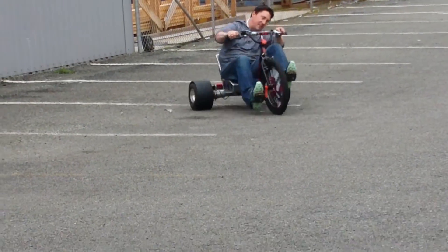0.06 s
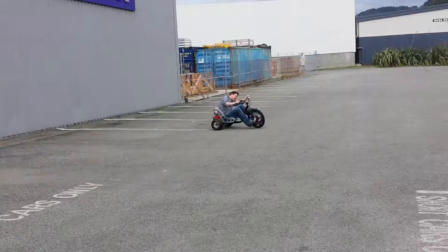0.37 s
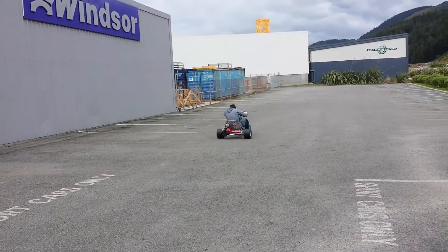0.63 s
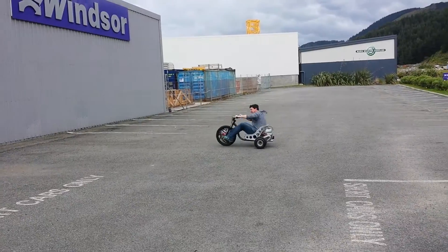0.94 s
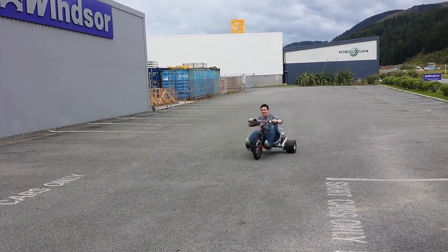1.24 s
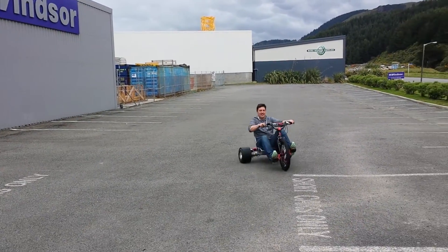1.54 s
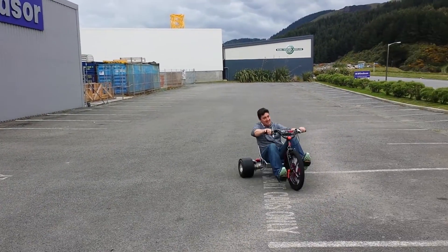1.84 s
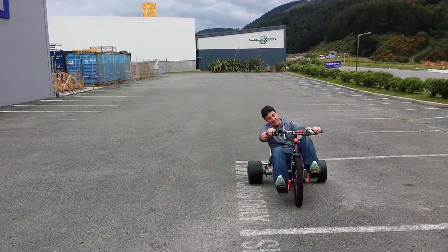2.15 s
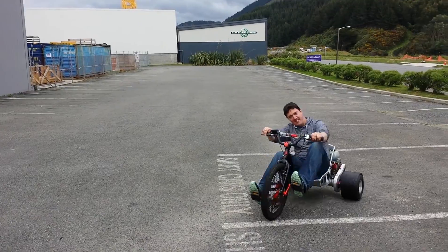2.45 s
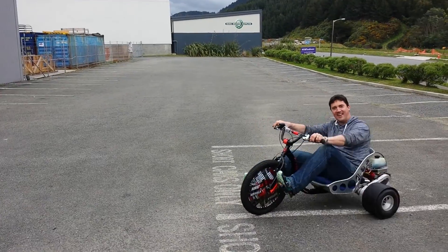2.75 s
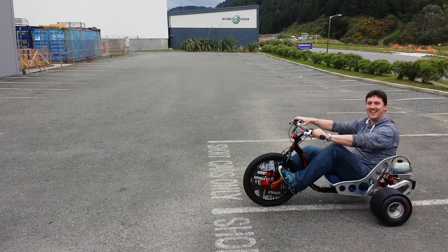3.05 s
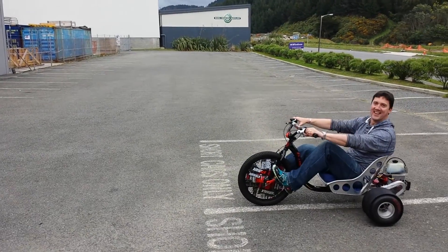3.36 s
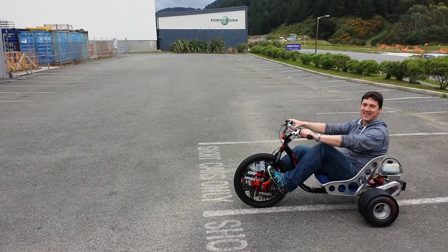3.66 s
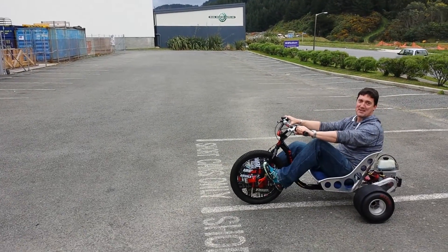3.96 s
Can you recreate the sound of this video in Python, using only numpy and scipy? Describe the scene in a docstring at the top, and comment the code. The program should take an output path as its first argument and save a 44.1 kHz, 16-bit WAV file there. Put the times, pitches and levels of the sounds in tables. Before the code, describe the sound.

A small petrol trike engine roars as its tyres slide, then drops to an idle.

```python
"""An open asphalt car park, where a drift trike with a single-cylinder petrol engine spins round.
The exhaust roars and echoes off warehouse walls while the hard rear tyres slide and squeal.
The engine drops to a lumpy idle as the trike scrubs to a halt close by, then gives one quick rev.
The valve gear clatters between firings and a low wind picks up.
Sharp cracks come from grit under the wheels, and once from the exhaust as the throttle opens."""
import sys
import numpy as np
from scipy import signal
from scipy.fft import rfft, irfft
from scipy.io import wavfile

SR = 44100
rng = np.random.default_rng(int(sys.argv[2]) if len(sys.argv) > 2 else 0)


def log_audio(samples):
    """Write samples as a 16-bit WAV file to the path given in sys.argv[1]."""
    # one column per channel
    frames = np.atleast_2d(samples).T
    # limit to full scale, then quantise
    limited = np.clip(frames, -1, 1)
    pcm = np.round(limited * 32767).astype(np.int16)
    wavfile.write(sys.argv[1], SR, pcm)


N = 176400
T = np.arange(N) / SR
FREQS = np.fft.rfftfreq(N, 1 / SR)


def amp(db):
    """Turn decibels into a number to multiply by."""
    return 10 ** (np.asarray(db) / 20)


def unit(x):
    """Scale a signal to an average (RMS) strength of one."""
    return x / np.sqrt(np.mean(x ** 2) + 1e-20)


def curve(rows, column=1):
    """One column of a table, joined by straight lines in time."""
    rows = np.array(rows)
    return np.interp(T, rows[:, 0], rows[:, column])


def add(mix, start_s, sound):
    """Drop a sound into the mix at a given time."""
    part = mix[round(start_s * SR):][:len(sound)]
    part += sound[:len(part)]


def colour(x, rows, column=1):
    """Make some frequencies louder and others softer, as a table says."""
    rows, size = np.array(rows), 4096
    hz = abs(np.fft.fftfreq(size, 1 / SR))
    log_gain = np.log(amp(np.interp(np.log(hz + 1), np.log(rows[:, 0]), rows[:, column])))
    response = np.exp(np.conj(signal.hilbert(log_gain)))  # rings after a sound, never before
    ring = np.fft.ifft(response).real[:size // 2]
    return signal.oaconvolve(x, ring)[:N]


def colour_pair(x, rows):
    """Give each ear its own tone colour."""
    return np.array([colour(x[0], rows, column=1), colour(x[1], rows, column=2)])


def noise_pair(alike):
    """Hiss for two ears: unrelated at 0, the same at 1."""
    shared, own = rng.standard_normal((2, N))
    return np.array([shared, alike * shared + np.sqrt(1 - alike ** 2) * own])


def wander(rate_hz):
    """A smooth random wobble, mostly slower than rate_hz."""
    return unit(irfft(rfft(rng.standard_normal(N)) / (1 + (FREQS / rate_hz) ** 4), N))


def per_cycle(cycles, scatter_db):
    """A random strength, held through each engine cycle."""
    return amp(scatter_db * rng.standard_normal(N))[np.floor(cycles).astype(int)]


def firings(cycles, scatter_db):
    """One click at the start of each cycle."""
    return np.diff(np.floor(cycles), prepend=np.floor(cycles[0])) * per_cycle(cycles, scatter_db)


# how fast the engine runs (time [s], firing rate [Hz])
ENGINE_SPEED = [(0.0, 116.64), (0.046, 94.54), (0.166, 111.36), (0.294, 118.85), (0.42, 127.49),
                (0.536, 127.92), (0.6, 113.4), (0.68, 95.46), (0.75, 93.88), (0.95, 92.56), (1.32, 90.86),
                (1.5, 96.04), (1.64, 92.74), (1.72, 73.19), (1.85, 59.4), (2.0, 42.8), (2.13, 37.34),
                (2.22, 44.85), (2.35, 35.77), (2.52, 32.16), (2.68, 43.21), (2.86, 42.38), (2.95, 48.1),
                (3.15, 51.4), (3.2, 66.05), (3.25, 91.97), (3.39, 88.06), (3.48, 72.35), (3.7, 45.86),
                (3.8, 44.76), (3.88, 34.65), (3.94, 45.27), (4.0, 44.53)]
def engine_cycles(lead_s=0):
    """Count engine cycles, running lead_s ahead: the fuel fires at each whole number."""
    speed = curve(ENGINE_SPEED)
    return np.cumsum(speed) / SR + lead_s * speed


def open_throttle(levels, tone):
    """The exhaust under power: a smooth boom on two low notes, and a rough bark at each firing."""
    fade_s, puff_cycles, split_hz = .025, .12, 602
    inside_s = np.minimum(T - levels[0][0], levels[-1][0] - T)
    gate = np.clip(1 + inside_s / fade_s, 0, 1) ** 2
    cycles, port = engine_cycles(), engine_cycles(lead_s=.00061)
    boom = -np.sqrt(2) * sum(amp(curve(levels, k)) * np.sin(2 * np.pi * k * cycles) for k in (1, 2))
    puffs = np.exp(-(port % 1) / puff_cycles) * rng.standard_normal(N)
    bark = colour(.17 * unit(puffs) + unit(firings(port, scatter_db=.9)), tone)
    low = irfft(rfft(bark) / (1 + (FREQS / split_hz) ** 10), N)
    bark = amp(curve(levels, 3)) * unit(low) + amp(curve(levels, 4)) * unit(bark - low)
    return gate * (amp(-.5) * boom + amp(-1.5) * bark)


# loudness of the roar (time [s], lowest note [dB], octave above [dB], low bark [dB], high bark [dB])
ROAR_LEVELS = [(0.0, -39, -32, -42, -38), (0.11, -22, -22, -22.5, -30), (0.142, -21, -20.5, -53, -25.5),
               (0.166, -24, -20, -27, -25.5), (0.276, -20, -29, -27.5, -24.5),
               (0.342, -25, -19.5, -24, -23), (0.388, -21, -17, -27, -21), (0.43, -16.5, -33, -28, -17),
               (0.536, -17, -15.5, -34, -22.5), (0.638, -31, -25, -28.5, -33),
               (0.724, -19.5, -15.5, -24, -20.5), (1.104, -26.5, -18.5, -23.5, -22),
               (1.216, -24.5, -20, -30, -23.5), (1.256, -26, -20.5, -52, -16.5),
               (1.316, -25, -21.5, -45, -28), (1.364, -23, -23, -23.5, -21.5),
               (1.45, -21.5, -18.5, -30, -22.5), (1.544, -17.5, -15, -22, -25),
               (1.612, -19, -15.5, -26.5, -21.5), (1.66, -15.5, -17.5, -28, -29)]
# tone of the bark far off (frequency [Hz], level [dB])
FAR_BARK_TONE = [(170,-36),(280,1),(370,2),(470,-3.5),(560,6.5),(670,3.5),(790,2.5),(930,10.5),(1060,3.5),(1250,-2.5),(1600,-8.5),(3000,-30),(9000,-54)]
def roar():
    """The exhaust far off, its tone shifting as the pipe swings round."""
    return open_throttle(ROAR_LEVELS, FAR_BARK_TONE)


# how late the echo off the long warehouse wall arrives (time [s], delay [s])
WALL_DELAY = [(0,0.018),(.3,0.022),(.6,0.028),(.9,0.033),(1.3,.034),(1.7,0.038)]
def wall_echo(exhaust):
    """One echo that comes later as the trike moves, so the bark swells and turns hollow."""
    bark = signal.sosfilt(signal.butter(2, 350, "high", fs=SR, output="sos"), exhaust)
    return amp(-6) * np.interp(T - curve(WALL_DELAY), T, bark, left=0)


def yard_echoes(exhaust):
    """Many thin, dull echoes bounce off the warehouse walls."""
    echoes_per_s, first_s, fade_60_db_s = 1500, .03, .93
    t = T[:SR // 2]
    echoes = rng.standard_normal((2, len(t))) * (rng.random((2, len(t))) < echoes_per_s / SR)
    echoes *= (t > first_s) * np.exp(-np.log(1000) * t / fade_60_db_s)
    echoes /= np.linalg.norm(echoes, axis=1, keepdims=True)
    dull = colour(exhaust, [(120, -19.5), (400, 16), (3000, 16), (10000, -39)])
    return amp(-20.5) * signal.fftconvolve(dull[None], echoes, axes=1)[:, :N]


# loudness of the valve clatter (time [s], level [dB])
CLATTER_LEVELS = [(0,-35.5),(.4,-25.5),(1.4,-25),(1.8,-31.5),(2.5,-34),(2.68,-25),(3.15,-23),(3.25,-14.5),(3.38,-19.5),(3.47,-20),(3.7,-24.5),(4,-25)]
# tone of its rattle (frequency [Hz], left [dB], right [dB])
RATTLE_TONE = [(690, 5, -23), (950, -14, -11), (1410, 0, -4.5), (2250, -42, -9), (2580, -7.5, -23),
               (2870, -78, 0), (3330, -41, -3.5), (4400, -45, 0), (5730, -16, -5.5), (5800, -9, -20),
               (6940, -12, -12), (7870, -12, -20.5), (8150, -0.5, -1), (10100, -14, -43.5),
               (10900, -10.5, -21), (13000, -49, -24)]
# notes the engine metal rings at (frequency [Hz], left [dB], right [dB])
METAL_NOTES = [(3200,-33,1),(3290,-5,2),(3610,-7,-23),(4220,-39,3),(4610,-1.5,4.5),(4810,-31,3.5),(7160,-2.5,-34),(7910,-14,-4),(8780,-3.5,-41),(8630,3.5,-40),(9750,-16,-4.5)]
def valve_gear():
    """Between firings a burst of small knocks rattles the engine and sets its metal ringing."""
    lag_cycles, rise_cycles, fade_cycles = .392, .07, .33
    knocks_per_s, ring_s = 3500, .0048
    cam = engine_cycles() - lag_cycles
    burst = np.minimum(cam % 1 / rise_cycles, 1) * np.exp(-(cam % 1) / fade_cycles)
    burst *= per_cycle(cam, scatter_db=1.1)
    rattle = unit(colour_pair(noise_pair(alike=.83) * (.28 + burst), RATTLE_TONE))
    knocks = burst ** 2 * (rng.random(N) < knocks_per_s / SR)
    t, metal = T[:SR // 20], np.zeros((2, N))
    for hz, left_db, right_db in METAL_NOTES:
        detune = 1 + .019 * rng.standard_normal((2, 1))
        ring = np.sin(2 * np.pi * hz * detune * t) * np.exp(-t / ring_s)
        metal += amp([[left_db], [right_db]]) * signal.oaconvolve(knocks[None], ring, axes=1)[:, :N]
    metal = signal.sosfilt(signal.butter(5, [2880, SR / 4], "band", fs=SR, output="sos"), metal)
    return amp(curve(CLATTER_LEVELS)) * unit(rattle + amp(-4) * unit(metal))


def grind(levels, tone, grain_db, judder_db, judder_hz, alike):
    """Hard plastic on asphalt: a grainy hiss whose lows and highs judder with the rough ground."""
    grains = colour_pair(noise_pair(alike) * amp(grain_db * wander(rate_hz=1200)), tone)
    low = signal.sosfiltfilt(signal.butter(2, 6900, fs=SR, output="sos"), grains)
    ground = wander(judder_hz)
    left, right = sum(band * amp(judder_db * np.tanh(ground + wander(judder_hz)))
                      for band in (low, grains - low))
    return np.array([unit(left) * amp(curve(levels, 1)), unit(right) * amp(curve(levels, 2))])


# loudness of the sliding tyres (time [s], left [dB], right [dB])
SLIDE_LEVELS = [(0,-33.5,-27.5),(.28,-27.5,-21),(.45,-18.5,-11.5),(.68,-18,-8.5),(.71,-13,-7),(.9,-12,-3.5),(1.05,-15.5,-8.5),(1.25,-19,-10),(1.45,-23,-17),(1.62,-28,-22),(1.76,-33.5,-27.5),(2,-37,-33),(2.3,-70,-70)]
# tone of their grinding (frequency [Hz], left [dB], right [dB])
SLIDE_TONE = [(484, -16, -40.5), (705, -23.5, -11), (1110, -8.5, -10), (1900, -9.5, -9.5), (2640, -11, -12),
              (3780, -11.5, -6.5), (3930, -19, -7), (4870, -19.5, -4), (6050, -18, -16.5),
              (7420, -21.5, -28), (7900, -18, -25.5), (10630, -26.5, -38.5), (13700, -42, -36),
              (15600, -73, -98)]
# notes they squeal at (frequency [Hz], level [dB])
SQUEAL_NOTES = [(1020,-14.5),(1230,3),(1760,-6.5),(3600,1.5),(4760,3.5)]
def tyre_slide():
    """The rear tyres grind sideways; sticking and slipping adds fuzzy, wavering squeals."""
    squeal = np.zeros((2, N))
    for hz, db in SQUEAL_NOTES:
        cycles = np.cumsum(hz * (1 + .03 * wander(rate_hz=7))) / SR
        fuzz = wander(rate_hz=26.6)
        squeal += amp(db) * fuzz * np.sin(2 * np.pi * (cycles + .13 * rng.random((2, 1))))
    squeal = amp(-10) * amp([curve(SLIDE_LEVELS, 1), curve(SLIDE_LEVELS, 2)]) * unit(squeal)
    return squeal + grind(SLIDE_LEVELS, SLIDE_TONE, grain_db=-.5, judder_db=2.1, judder_hz=90, alike=.53)


# tone of the background (frequency [Hz], left [dB], right [dB])
AIR_TONE = [(20,-35,-32),(60,-5.5,-7),(162,-2.5,-3),(540,-17,-12.5),(1590,-24.5,-33),(5360,-24.5,-15),(15300,-45,-63)]
def open_air():
    """The steady, soft rush of the outdoors."""
    return amp(-30.5) * unit(colour_pair(noise_pair(alike=1), AIR_TONE))


# each sharp crack (time [s], level [dB], fade time [s])
CRACKS = [(0.062,-11,0.0012),(.4,-1.5,0.0011),(0.694,-17,.003),(2.227,-13,0.0034),(2.391,-0.5,0.0019),(2.524,-19,0.0016),(2.7681,-11,0.011),(2.8155,-16,0.0026),(3.018,-22,0.0029),(3.907,-32,0.0032),(3.9525,-26,0.0069)]
# tone of a crack (frequency [Hz], left [dB], right [dB])
CRACK_TONE = [(400,-15,5),(890,-9.5,1),(1350,14,1.5),(2220,-6,9.5),(2740,2,-8.5),(3280,-7,9),(5000,-22,4),(6640,-10,-6.5),(9200,-8,-16),(15000,-34,-42)]
def sharp_cracks():
    """Short bursts of noise: grit under the wheels, and the exhaust's snap as the throttle opens."""
    force, t = np.zeros(N), T[:SR // 10]
    for start_s, db, fade_s in CRACKS:
        add(force, start_s, amp(db) * np.exp(-t / fade_s))
    return amp(3.5) * colour_pair(force * noise_pair(alike=.9), CRACK_TONE)


# harder firings at idle and as the throttle opens or shuts (rough time [s], level [dB])
HARD_FIRINGS = [(.695,-2.5),(2.879,-12),(2.943,-10),(3.025,-6.5),(3.106,-4),(3.183,-9),(3.417,-3),(3.44,-1.5),(3.769,-5.5),(3.917,-29),(3.961,-5.5)]
def pops():
    """Each pop is one quick push and pull of air, placed on the nearest firing."""
    width_s, out = .00077, np.zeros(N)
    fired_s = T[np.flatnonzero(np.diff(np.floor(engine_cycles())))]
    for near_s, db in HARD_FIRINGS:
        offset = (T - fired_s[np.argmin(abs(fired_s - near_s))]) / width_s
        out -= amp(db) * 2 * offset / (1 + offset ** 2) ** 2
    return out


# loudness of the exhaust with the throttle shut (time [s], level [dB])
IDLE_LEVELS = [(0,-57),(1.62,-75),(1.67,-23),(1.85,-22),(2,-22.5),(2.45,-21.5),(2.8,-21.5),(3.17,-18),(3.24,-40),(3.39,-35),(3.45,-15),(3.55,-17.5),(4,-19.5)]
# tone of one thud (frequency [Hz], level [dB])
THUD_TONE = [(20,-91),(45,-8),(85,-5.5),(135,11.5),(190,4.5),(230,2.5),(300,0),(370,-2),(450,-33),(580,-8),(800,-35),(1300,-62),(4000,-112)]
def idle():
    """Soft, uneven thuds, each ringing the silencer at a slightly different pitch."""
    pipe_hz, ring_s = 261, .005
    clicks = firings(engine_cycles(lead_s=.001975), scatter_db=1.1) / np.sqrt(curve(ENGINE_SPEED))
    t, pipe = T[:SR // 20], np.zeros(N)
    for at in np.flatnonzero(clicks):
        hz = pipe_hz * np.exp(.15 * rng.standard_normal())
        add(pipe, at / SR, clicks[at] * np.sin(2 * np.pi * hz * t) * np.exp(-t / ring_s))
    thuds = unit(colour(clicks, THUD_TONE))
    return amp(curve(IDLE_LEVELS)) * unit(thuds + amp(1.5) * unit(pipe))


# loudness of the stopping tyres (time [s], left [dB], right [dB])
SCRUB_LEVELS = [(1.75,-65,-57),(1.92,-33.5,-29),(2,-19.5,-17.5),(2.22,-25,-18.5),(2.44,-28.5,-22.5),(2.58,-22,-18),(2.72,-33,-27),(2.85,-31,-30.5),(3.1,-39,-30.5),(3.3,-57,-65)]
# their tone (frequency [Hz], left [dB], right [dB])
SCRUB_TONE = [(530, -0.5, -4), (890, -5.5, -10.5), (1260, 4.5, 1.5), (1550, 4, -2), (2100, -6.5, -1.5),
              (2660, -3.5, -9.5), (2970, -5.5, -2.5), (5070, -20, -3.5), (6300, -14, -29), (8500, -43, -29),
              (11000, -44, -33), (14700, -94, -46)]
def tyre_scrub():
    """The tyres scrape to a halt with a coarser grain and a slower, deeper judder."""
    return grind(SCRUB_LEVELS, SCRUB_TONE, grain_db=2.5, judder_db=4, judder_hz=44.6, alike=.69)


# loudness of the wind (time [s], level [dB])
WIND_LEVELS = [(0,-51),(1.3,-50),(1.7,-45),(2.3,-33),(2.6,-23.5),(3.3,-25),(4,-23.5)]
# its tone (frequency [Hz], level [dB])
WIND_TONE = [(10,-1),(22,-11),(45,-5),(80,-5),(200,-18),(1000,-72)]
def wind():
    """Wind blowing on the microphone makes a low rumble."""
    rumble = np.array([colour(ear, WIND_TONE) for ear in noise_pair(alike=.17)])
    return amp(curve(WIND_LEVELS)) * unit(rumble)


# loudness of the rev (time [s], lowest note [dB], octave above [dB], low bark [dB], high bark [dB])
REV_LEVELS = [(3.19, -27, -22.5, -19, -24), (3.244, -21, -15, -19.5, -24), (3.38, -21.5, -16, -18.5, -20.5),
              (3.41, -33, -29, -20, -22.5)]
# tone of the bark close by (frequency [Hz], level [dB])
NEAR_BARK_TONE = [(120,-19),(270,-3),(360,7),(480,-3.5),(620,2),(760,-13.5),(1050,-9),(1400,-28),(2200,-22),(4000,-21),(9000,-66)]
def quick_rev():
    """The throttle opens for a moment and the exhaust barks close by."""
    return open_throttle(REV_LEVELS, NEAR_BARK_TONE)


def scene():
    """Mix everything for two ears, with the nearby exhaust a little to the right."""
    far = roar()
    near = pops() + idle() + quick_rev()
    tyres = tyre_slide() + tyre_scrub()
    background = open_air() + wind()
    exhaust = far + near * amp([[-1.28], [1.28]])
    echoes = wall_echo(far) + yard_echoes(far + amp(-9) * near)
    return exhaust + echoes + valve_gear() + tyres + sharp_cracks() + background


def record(dry):
    """Flatten the loudest peaks, then cut the very highest treble."""
    treble_cut = signal.firwin(511, 15700, window=("kaiser", 9), fs=SR)
    return signal.oaconvolve(np.clip(dry, -1, 1), treble_cut[None], "same")


dry = scene()
out = record(dry)
log_audio(out)
```